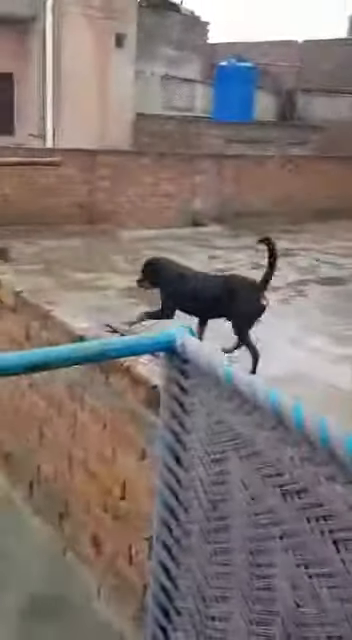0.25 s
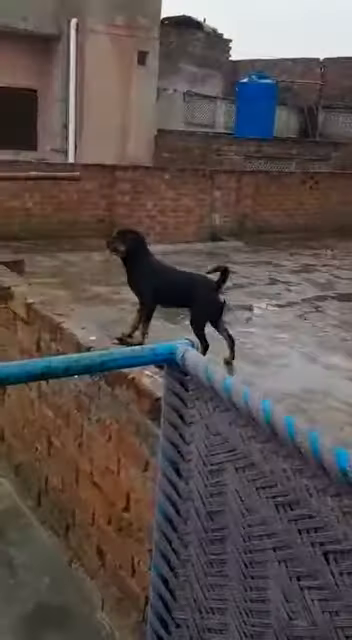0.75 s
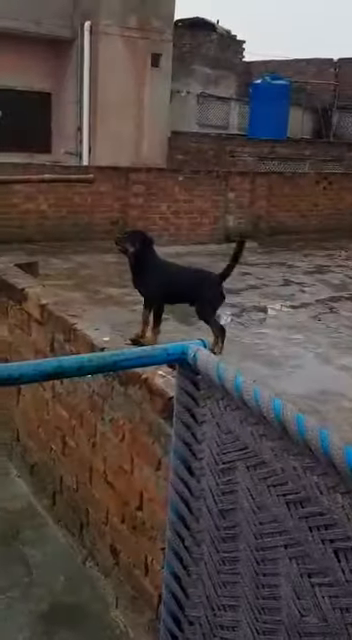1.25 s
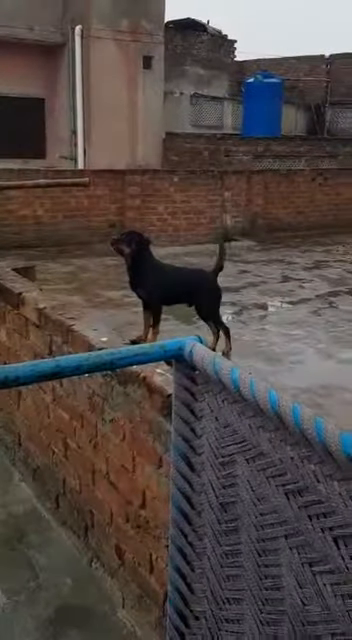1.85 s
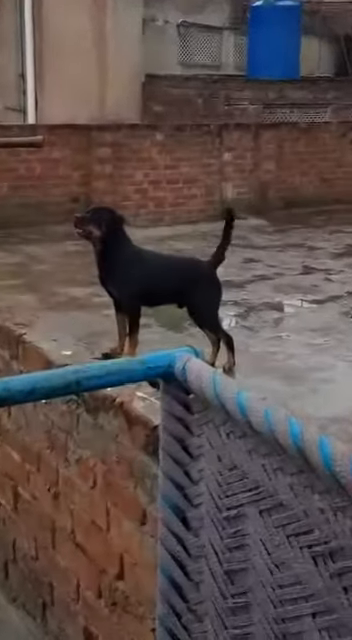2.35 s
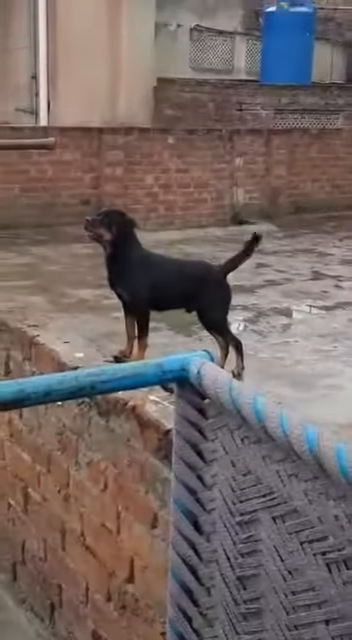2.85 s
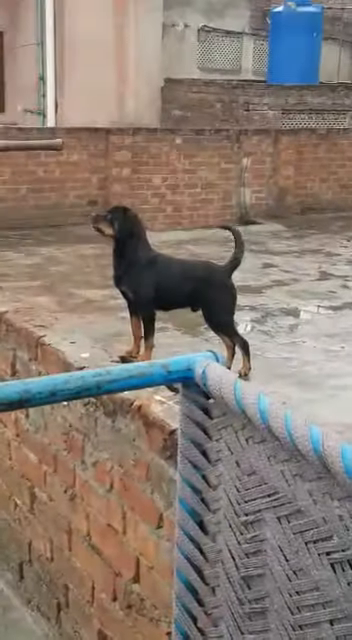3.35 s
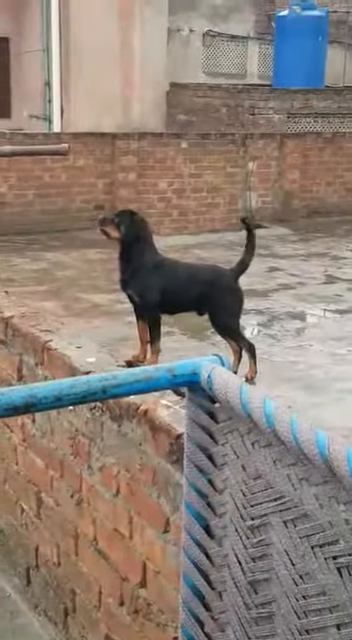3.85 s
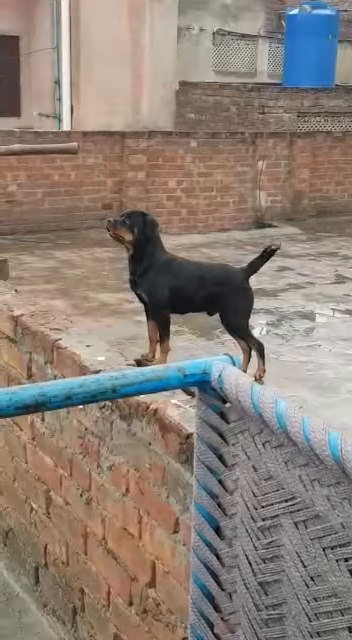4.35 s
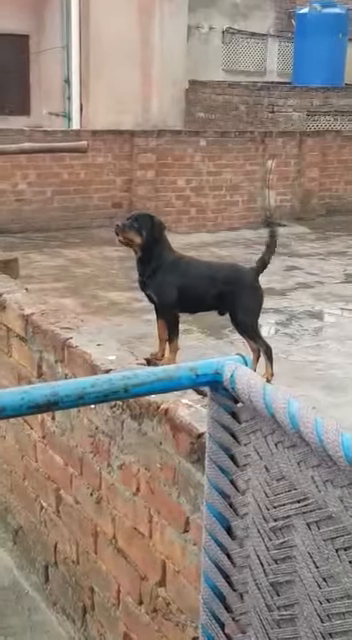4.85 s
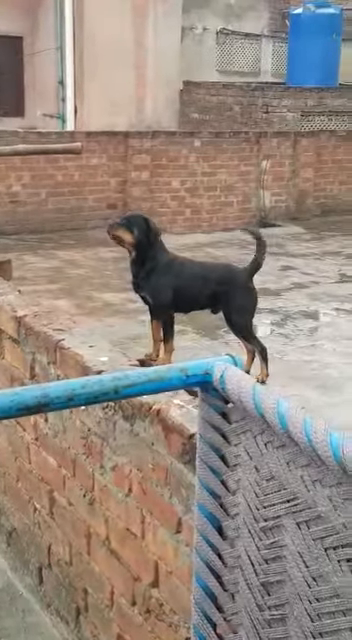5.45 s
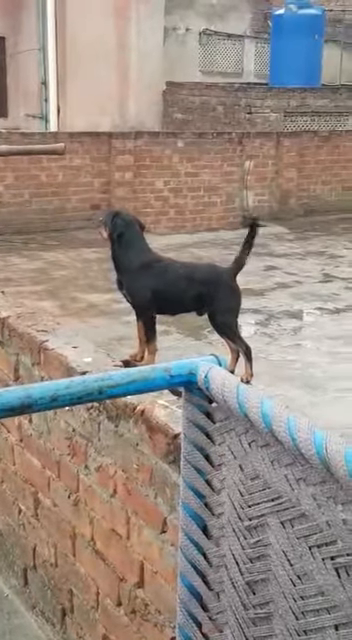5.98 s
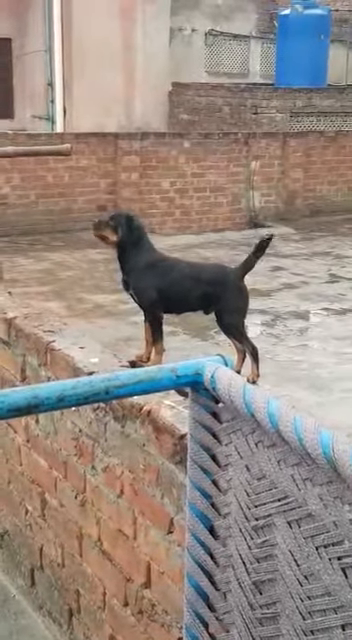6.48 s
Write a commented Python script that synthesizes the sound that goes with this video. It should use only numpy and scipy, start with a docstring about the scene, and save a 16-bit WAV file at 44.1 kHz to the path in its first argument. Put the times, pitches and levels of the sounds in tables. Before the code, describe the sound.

A dog barks in short runs of two or three on an echoing rooftop, with a brief gust of wind on the microphone.

```python
"""A large dog barks in short runs on a brick-walled rooftop, some metres from a hand-held phone.
Each bark rises as a clear tone from the vocal folds and breaks into a rasp as they flutter;
walls and neighbouring houses answer. One faint, thin bark falls between the runs.
At the phone a gust buffets the two microphone ports; close by are a faint rattle and a soft swish.
Far off, a town murmurs."""
import sys
import numpy as np
from scipy import signal
from scipy.fft import rfft, irfft, next_fast_len
from scipy.io import wavfile
from scipy.ndimage import map_coordinates

SR = 44100
rng = np.random.default_rng(int(sys.argv[2]) if len(sys.argv) > 2 else 0)


def master(y):
    """Save y as 16-bit WAV."""
    cut = np.clip(np.atleast_2d(y).T, -1, 1)
    pcm = np.round(cut * 32767)  # scale
    wavfile.write(sys.argv[1], SR, pcm.astype(np.int16))


N = 296352

# the dog, some metres off: t/s, attack/s, hold/s, top pitch/Hz, scoop up to it/fraction, tone/dB,
# rasp/dB, break from tone to rasp/dB, mouth resonance/Hz, its level in the rasp/dB, lift near 2 kHz/dB
BARKS = [ (.386, .062, .03, 399.4, 0.01, -38.5, -35.5, 2, 450, -2.5, -3.5),
         (.656, 0.0545, 0.0757, 488, .12, -27, -30, -2.5, 657, -3, 3),
         (1.975, 0.066, 0.049, 498, 0.24, -23, -21.5, 12, 702, -4, 3.5),
         (2.276, 0.045, 0.043, 524.3, 0.13, -19.5, -26.5, 3, 615, -1, 1.5),
         (2.633, .036, 0.057, 503, 0.22, -24, -28.5, -1.5, 695, 0, 2),
         (3.911, 0.049, 0.066, 516, 0.34, -26, -24.5, 8, 682, 0, 6),
         (4.216, .037, .04, 540.3, .18, -22.5, -27.5, 0.5, 654, -1, -2),
         (4.546, .036, .054, 544, 0.29, -22.5, -29, 1.5, 688, 2, -2.5),
         (6.261, 0.063, 0.068, 480.4, 0.21, -25, -24, 10, 713, -2.5, 2.5),
         (6.586, 0.044, .1, 490.4, 0.01, -23, -27, 8, 648, 0, -0.5), ]
# one faint, thin bark, same columns
FAR_BARKS = [(3.11, 0.049, 0.03, 483, 0.086, -49, -41, 0.64, 1080, -3.1, 8.3)]


def dog(barks):
    """Barks on the rooftop; the head moves between them, so each wakes the walls a little differently."""
    track = np.zeros((2, N))
    for row in barks:
        start, voice = bark(row)
        add(track, start, rooftop(voice))
    return track


RELEASE_S = .032


def effort(t, attack, hold, top_hz, scoop, tone_db, rasp_db, break_db,
           onset_db=20, release_db=24, glide_lag_s=.039, sag_hz_per_s=950):
    """Pitch, tone level and rasp level of one push of air; break_db tips tone into rasp as it holds."""
    late = np.maximum(t - attack - hold, 0)
    push_db = -onset_db * np.maximum(1 - t / attack, 0) ** .86 - release_db * late / RELEASE_S
    broken = np.clip((t - attack) / hold, 0, 1)
    # the pitch tops out after the push does, flattening as it arrives, and sinks in the release
    glide_left = np.clip(1 - t / (attack + glide_lag_s), 0, 1) ** 1.4
    pitch = top_hz * (1 - scoop * glide_left) - sag_hz_per_s * late
    return pitch, tone_db + push_db - break_db * broken, rasp_db + .6 * push_db - break_db * (1 - broken)


# throat and mouth shaping the harmonics: f/Hz, relative level/dB
THROAT = [(250, -43.5), (400, -10.5), (520, -22), (750, 1), (970, -3.5), (1120, -3), (1350, -13),
          (1600, -21.5), (1950, -26.5), (2250, -40.5), (2800, -40), (3300, -59.5), (5400, -43), (8000, -68)]
# throat and mouth shaping the rasp: f/Hz, relative level/dB
RASP = [(150, -49), (300, -21.5), (470, -2), (600, -6.5), (850, 0), (1280, -7), (1650, -20.5), (2080, -20),
        (3150, -48), (3800, -35.5), (4400, -54.5), (5000, -39.5), (7300, -46.5), (8500, -55.5),
        (10500, -47), (15500, -66.5)]


def bark(row, edge_s=.016, jitter=.044, flutter_hz=185, flutter=.46, shimmer_db=3.03, ring_width_hz=100):
    """Vocal folds sing a hoarse rising tone; as the rasp grows they flutter and chop the air into noise."""
    start, attack, hold, *voicing, mouth_hz, mouth_db, bright_db = row
    t = np.arange(-edge_s, attack + hold + RELEASE_S + edge_s, 1 / SR)
    size = len(t)
    pitch, tone_db, rasp_db = effort(t, attack, hold, *voicing)
    # the folds are unsteady as they start, and again when the rasp takes over
    rough = 1 / (1 + amp(tone_db - rasp_db)) + .15 * np.exp(-(t - t[0]) / .07)
    phase = 2 * np.pi * np.cumsum(pitch * (1 + jitter * rough * wobble(299, size))) / SR
    harmonic = lambda k: amp(along(THROAT, k * pitch) + shimmer_db * wobble(140, size)) * np.sin(k * phase)
    tone = unit(sum(harmonic(k) for k in range(1, 15)))
    # a slower second vibration puts side lines between the harmonics
    flap = np.sin(2 * np.pi * np.cumsum(flutter_hz * (1 + .156 * wobble(89.3, size))) / SR)
    tone *= 1 + flutter * rough * flap
    # air leaves in one uneven puff per cycle
    puffs = (1 + .55 * np.cos(phase)) * (1 + .5 * flap) * amp(1.2 * wobble(120, size))
    rasp = coloured(puffs * rng.standard_normal(size), RASP)
    # the mouth rings narrowly; its resonance rises as the jaw opens and sinks as it closes
    swing = np.linspace(-1, 1, size)
    jaw = 1 - .0974 * swing ** 2 - .0816 * swing
    ring = wobble(ring_width_hz, size) + 1j * wobble(ring_width_hz, size)
    ring *= np.exp(2j * np.pi * np.cumsum(mouth_hz * jaw) / SR)
    rasp = unit(rasp + amp(mouth_db) * unit(ring.real))
    gate = np.clip(np.minimum(t - t[0], t[-1] - t) / edge_s, 0, 1)
    voice = gate * (amp(tone_db) * tone + amp(rasp_db) * rasp)
    # a wider mouth lifts the upper resonance
    lift = [(1500, .014), (1900, bright_db), (2300, bright_db), (3000, 0)]
    return start + t[0], filtered(voice, lambda hz: amp(along(lift, hz)))


# echoes off the roof's walls and the houses around: delay/s, level/dB
WALLS = [(.013, -7.5), (.034, -7), (.062, -21), (.098, -21.5), (.128, -14.5), (.21, -16)]
# ring of the walled yard: f/Hz, time to fall 60 dB/s
YARD_RING = [(200, 3.5), (600, 0.79), (1100, 0.9), (2000, 0.72), (5000, 0.48), (12000, 0.48)]
# what brick and air do to the treble of every echo: f/Hz, gain/dB
ECHO_COLOUR = [(1200, -0.5), (2200, -3), (5000, 1), (12000, -3)]


def rooftop(voice, left_lead_s=.00017, direct_db=-.5, tail_db=-6, build_s=.03, scatter_s=.0081):
    """Direct sound from a little to the left, echoes scattered by brickwork, and the ring of the yard."""
    hz, age, noise = signal.stft(rng.standard_normal((2, SR)), SR, nperseg=256)
    decay = amp(-60 * age / along(YARD_RING, hz)[:, None])
    tail = signal.istft(noise * decay * (1 - np.exp(-age / build_s)), SR, nperseg=256)[1]
    answer = amp(tail_db) * tail / np.linalg.norm(tail[0])
    t = np.arange(SR // 40) / SR
    for delay, db in WALLS:
        smear = rng.standard_normal((2, len(t))) * np.exp(-t / scatter_s)
        add(answer, delay, amp(db) * smear / np.linalg.norm(smear[0]))
    echoes = signal.fftconvolve(voice[None], answer, axes=1)
    # echoes come from all sides: fully alike at the two ports only in the bass
    echoes = ports(echoes, [(200, 1), (620, .65), (1050, .17), (2000, .64), (4000, .58)])
    out = filtered(echoes, lambda f: amp(along(ECHO_COLOUR, f)))
    direct = filtered(voice, lambda f: np.exp(1j * np.pi * f * left_lead_s * np.array([[1], [-1]])))
    add(out, 0, amp(direct_db) * direct)
    return out


# gusts reaching the phone: crest t/s, level/dB, rise/s, fall/s
GUSTS = [(2.5, -52, 0.79, 2.5), (4.58, -32, 0.38, 0.25), (4.859, -26.5, 0.066, 0.043),
         (5.28, -40, 0.14, .11), (6.65, -36, 0.42, 0.37)]


def gusts(calm_db=-63.5):
    """Strength of the wind: each gust swells and dies away over the calm."""
    t = np.arange(N) / SR
    return amp(calm_db) + sum(amp(db) * np.exp(-((t - crest) / np.where(t < crest, rise, fall)) ** 2)
                              for crest, db, rise, fall in GUSTS)


# wind right on the microphone ports: f/Hz, relative level/dB
BUFFET = [(20, -28), (55, 0), (100, -5.5), (170, -14.5), (300, -13), (600, -38), (1500, -60), (4000, -87.5)]
# the strongest eddies: t/s, peak level/dB, f/Hz, left minus right/dB
EDDIES = [(3.288, -28.5, 79.5, -5), (3.754, -30, 70, -4), (4.324, -20, 88.4, -4), (4.437, -24, 88.6, -1),
          (4.534, -11.5, 95, -2), (4.605, -14.5, 65.8, 2), (4.664, -23, 67.7, -5), (4.842, -28, 69.2, 16),
          (4.875, -20.5, 108, -0.5), (5.108, -23.5, 59.3, 0.5), (5.224, -20.5, 68.5, -0.5),
          (6.68, -22, 64.5, -4)]


def wind(lumps_db=5.5, thump_cycles=1.13):
    """Lumpy buffeting, different at each port, with single eddies that thump."""
    lumps = amp(lumps_db * np.array([wobble(35, N), wobble(35, N)]))
    out = gusts() * unit(lumps * coloured(rng.standard_normal((2, N)), BUFFET))
    t = np.arange(SR // 8) / SR
    for start, db, hz, pan_db in EDDIES:
        age = 2 * t * hz / thump_cycles  # 1 at the peak
        turns = [rng.random() + np.cumsum(hz * np.exp(.41 * wobble(145, len(t)))) / SR for _ in range(2)]
        thump = age * np.exp(1 - age) * np.sin(2 * np.pi * np.array(turns))
        add(out, start, amp(db) * pan(pan_db) * thump)
    return out


# ticks near the phone: t/s, peak level/dB
TICKS = [(4.829, -57), (4.855, -53), (4.88, -52), (4.927, -47), (4.949, -57), (4.976, -54.5)]
# modes of the thing that rattles: f/Hz, width/Hz, relative level/dB
RATTLE_MODES = [(3300, 210, 8.5), (5500, 300, 11), (7000, 200, -1), (9700, 580, -12.5)]


def rattle(decay_s=.037, broadband=.03):
    """A few light, scratchy ticks close by, each a dying burst of noise coloured by the modes."""
    out = np.zeros((2, N))
    t = np.arange(SR // 10) / SR
    body = lambda f: broadband + sum(amp(db) * 1j * f * width / (hz * hz - f * f + 1j * f * width)
                                     for hz, width, db in RATTLE_MODES)
    for start, db in TICKS:
        tick = filtered(rng.standard_normal((2, len(t))), body) * np.exp(-t / decay_s)
        add(out, start, amp(db) * tick / np.abs(tick).max())
    return out


# a swish near the phone: crest t/s, level/dB, half length/s
SWISHES = [(5.461, -64.5, 0.073)]
# its spectrum: f/Hz, relative level/dB
SWISH_COLOUR = [(1500, -22), (4000, -2), (7500, -3.5), (11000, -11), (15000, -16.5)]


def swish(pan_db=5):
    """A brief, soft brush of treble noise, close on the left."""
    t = np.arange(N) / SR
    swell = sum(amp(db) * np.exp(-((t - crest) / half) ** 2) for crest, db, half in SWISHES)
    return pan(pan_db) * swell * coloured(rng.standard_normal((2, N)), SWISH_COLOUR)


# the distant town and hiss, heard from the roof: f/Hz, relative level/dB
TOWN_COLOUR = [(15, -35.5), (25, -22), (59, -5.5), (313, -12.5), (349, -10.5), (410, -10), (445, -14.5),
               (826, -17.5), (1020, -15.5), (1660, -26), (1950, -25), (2770, -38), (5010, -38.5),
               (7500, -56), (15500, -47)]
# how alike they are at the two ports: f/Hz, correlation
TOWN_LIKENESS = [(60, 0.69), (240, 0.91), (950, 0.59), (3770, -0.4), (15000, 0.22)]


def town(level_db=-46, waver_db=.5, hiss_db=-46):
    """The far rumble and murmur of the town, each drifting its own way, under a thin hiss."""
    air = unit(ports(coloured(rng.standard_normal((2, N)), TOWN_COLOUR), TOWN_LIKENESS))
    low = filtered(air, lambda hz: 1 / (1 + (hz / 6500) ** 4))
    rumble = filtered(air, lambda hz: 1 / (1 + (hz / 600) ** 4))
    murmur, hiss = low - rumble, air - low
    drift = lambda: amp(level_db + waver_db * wobble(5.5, N))
    return drift() * rumble + drift() * murmur + amp(hiss_db) * hiss


def ports(pair, likeness):
    """Blend two unrelated signals into left and right by a likeness curve (f/Hz, correlation)."""
    turn = lambda hz: np.arccos(np.clip(along(likeness, hz), -1, 1)) / 2
    mid, side = filtered(pair, lambda hz: np.array([np.cos(turn(hz)), np.sin(turn(hz))]))
    return np.array([mid + side, mid - side])


def pan(db):
    """Left and right gains, the left db above the right."""
    return amp(db * np.array([[.5], [-.5]]))


def amp(db):
    """Decibels to gain."""
    return 10 ** (np.asarray(db) / 20)


def unit(x):
    """Scale to rms 1."""
    return x / np.sqrt(np.mean(x ** 2) + 1e-20)


def along(points, hz):
    """Points (f/Hz, value) read on a log axis."""
    f, values = np.transpose(points)
    return np.interp(np.log(hz + 1), np.log(f + 1), values)


def wobble(rate, size):
    """A smooth random curve, rate knots a second."""
    knots = rng.standard_normal(int(size * rate / SR) + 4)
    return map_coordinates(knots, [np.arange(size) * rate / SR])


def filtered(x, response, pad=2048):
    """x through a complex frequency response, its ends mirrored."""
    padded = np.pad(x, [(0, 0)] * (x.ndim - 1) + [(pad, pad)], mode="reflect")
    size = next_fast_len(padded.shape[-1])
    spectrum = rfft(padded, size) * response(np.fft.rfftfreq(size, 1 / SR))
    return irfft(spectrum, size)[..., pad:pad + x.shape[-1]]


def coloured(x, spectrum):
    """x shaped by a spectrum (f/Hz, level/dB), at rms 1."""
    return unit(filtered(x, lambda hz: amp(along(spectrum, hz))))


def add(track, start_s, x):
    """Mix x into the track from start_s on."""
    part = track[..., max(round(start_s * SR), 0):][..., :x.shape[-1]]
    part += x[..., :part.shape[-1]]


# the two microphone ports differ in colour: f/Hz, left minus right/dB
PORT_BALANCE = [(50, -1.5), (150, 2.5), (380, -2.5), (700, 1.5), (1300, -2.5), (2400, 2.5), (4500, 3),
                (12000, -0.5)]


def scene():
    """Barks, town, wind, rattle and swish as they reach the phone's two ports."""
    sound = dog(BARKS) + dog(FAR_BARKS) + town() + wind() + rattle() + swish()
    return filtered(sound, lambda hz: pan(along(PORT_BALANCE, hz)))


def record(dry, fade_s=.003, notch_hz=8400, notch_width_hz=750, notch_db=-10, top_hz=15750):
    """The phone's microphone has a dip in the treble and a band limit."""
    # a 3 ms fade at each end keeps the sound from clicking
    fade = np.clip(np.minimum(np.arange(N), np.arange(N)[::-1]) / (fade_s * SR), 0, 1)
    notch = lambda hz: amp(notch_db * np.exp(-((hz - notch_hz) / notch_width_hz) ** 2))
    return filtered(dry * fade, lambda hz: notch(hz) * (hz < top_hz))


dry = scene()
out = record(dry)
master(out)
```